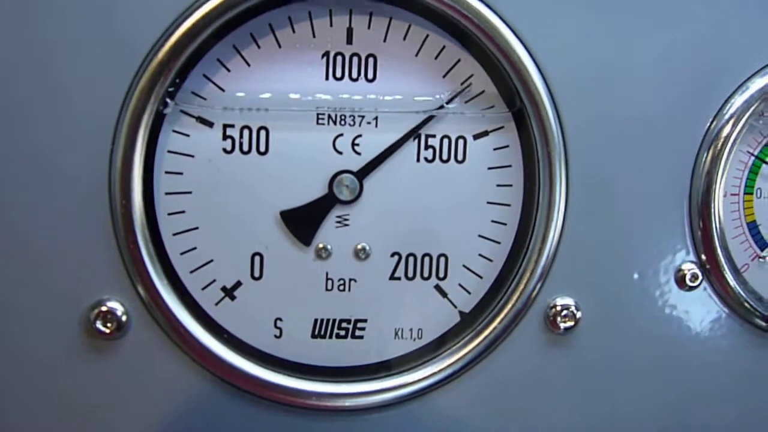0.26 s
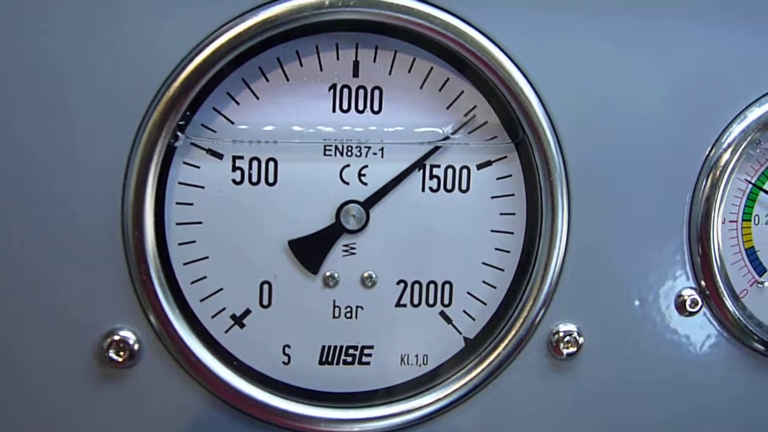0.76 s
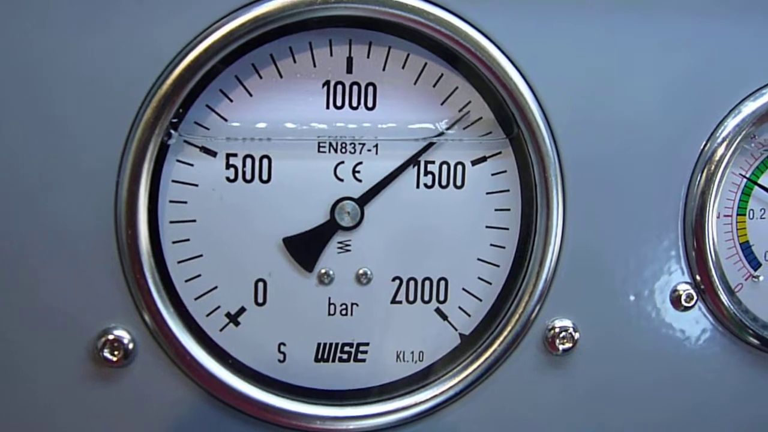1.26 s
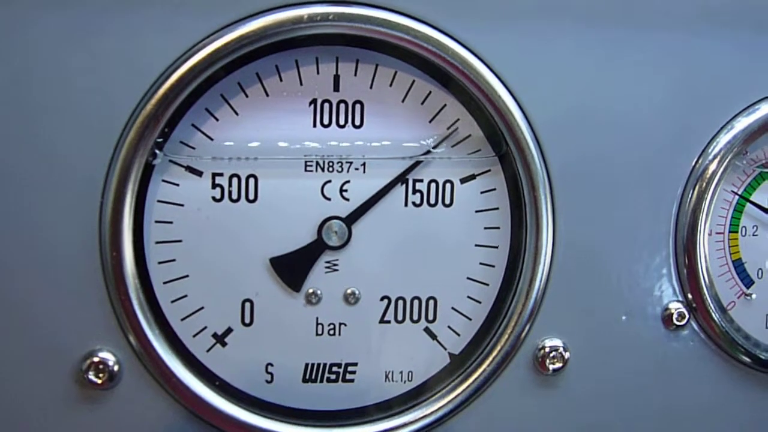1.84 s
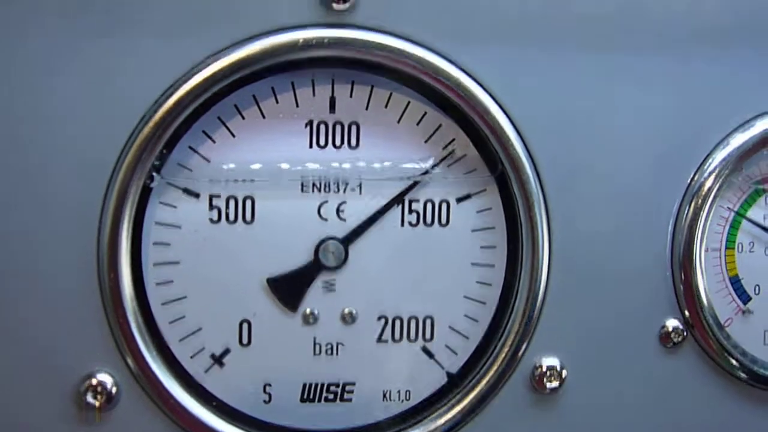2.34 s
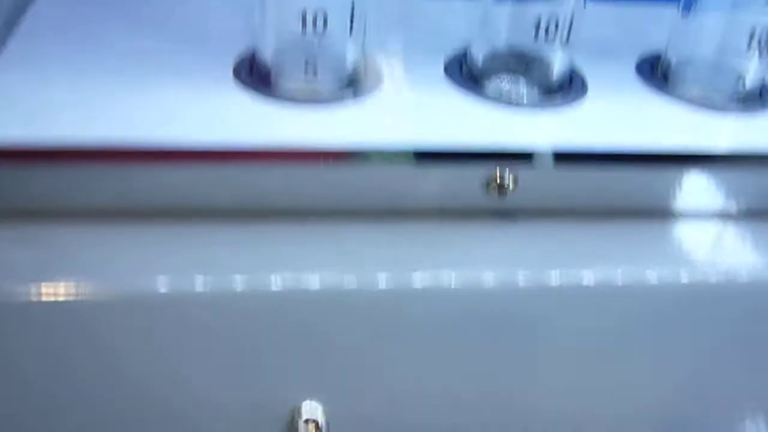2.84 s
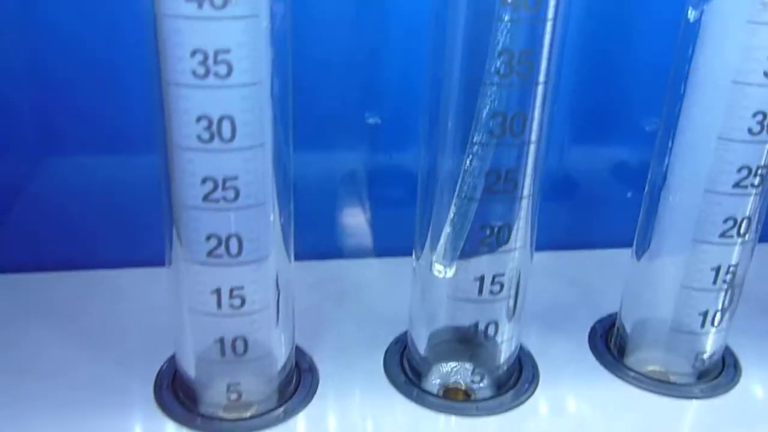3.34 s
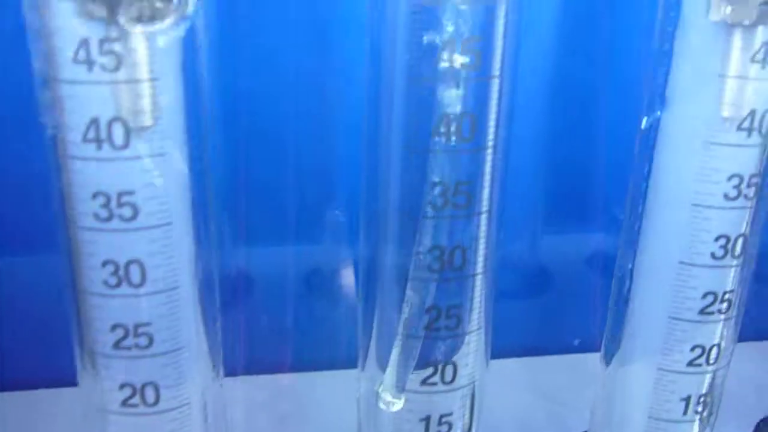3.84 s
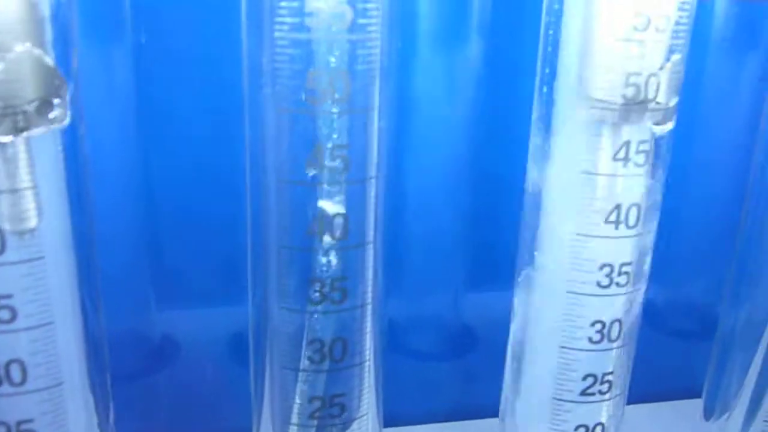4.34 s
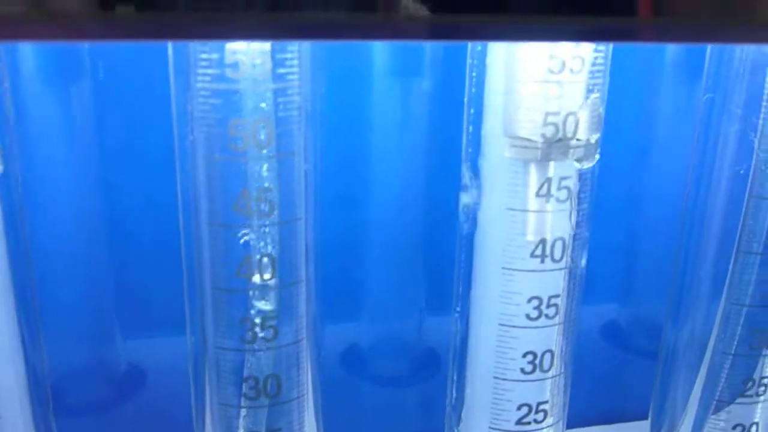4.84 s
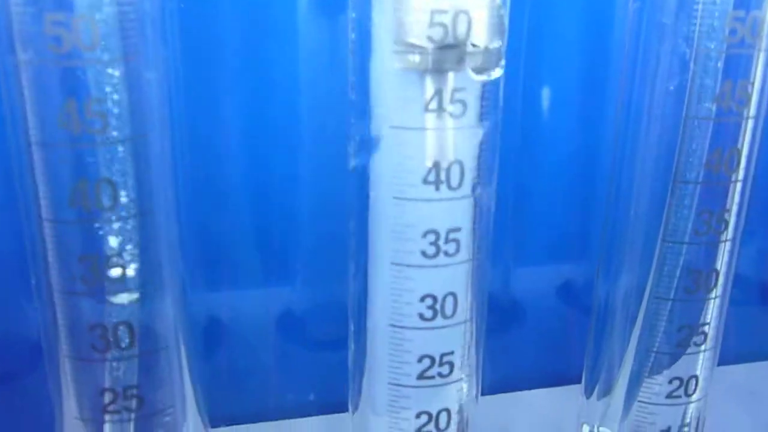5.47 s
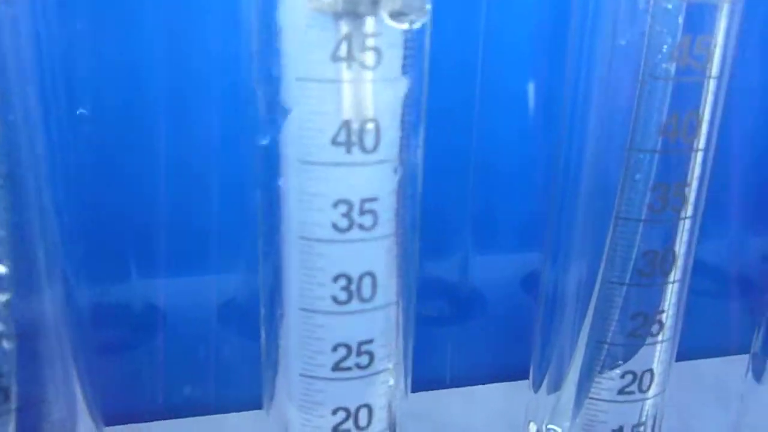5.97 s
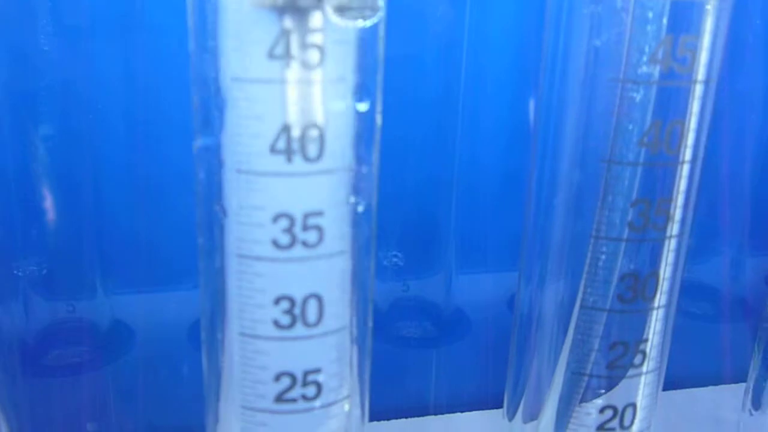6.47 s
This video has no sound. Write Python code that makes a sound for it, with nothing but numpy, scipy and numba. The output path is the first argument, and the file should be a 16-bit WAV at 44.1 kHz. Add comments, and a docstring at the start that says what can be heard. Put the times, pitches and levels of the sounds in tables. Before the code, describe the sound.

Fuel injectors on a workshop test bench snap in turn at a fast, strict beat, merging into a ringing metallic rattle. Beneath it a motor hums steadily and a fan and pump give an even rush. The hand-held microphone picks up a few soft, low handling bumps early on. About halfway through, the tone of the rattle shifts slightly as the microphone moves, while the pace stays the same.

```python
"""Four injectors snap in turn at a strict, fast beat on a workshop test bench.
Each snap and its second jolt ring the cabinet, hood, fuel rail and nozzles; the colour of the ringing
shifts as a small hand-held camera moves from the gauge up to the measuring tubes. Underneath, the motor
hums at twice the mains rate, fan and pump rush on, and the hand on the camera rumbles a little."""
import sys
import numpy as np
from scipy import signal
from scipy.fft import rfft, irfft
from scipy.io import wavfile
from scipy.ndimage import uniform_filter1d
from numba import njit

SR = 44100
rng = np.random.default_rng(int(sys.argv[2]) if len(sys.argv) > 2 else 0)


def persist_wave(psi):
    """Save psi, clipped to +-1, as 16-bit WAV."""
    counts = np.round(np.clip(psi, -1, 1) * 32767).astype(np.int16)
    wavfile.write(sys.argv[1], SR, np.atleast_2d(counts).T)


N = 295470


def undb(db):
    return 10 ** (np.asarray(db) / 20)


def band(x, lo_hz, hi_hz, order=3):
    return signal.sosfilt(signal.butter(order, [lo_hz, hi_hz], "band", fs=SR, output="sos"), x)


def unit_rms(x):
    return x / np.sqrt(np.mean(x ** 2))


def drift(rate_hz):
    """Smooth random wander: levels held for 1 / rate_hz seconds and slewed twice."""
    hold = int(SR / rate_hz)
    steps = np.repeat(rng.standard_normal(N // hold + 1), hold)
    return 1.8 * uniform_filter1d(uniform_filter1d(steps, hold), hold)[:N]


@njit
def ring_modes(length, onsets, strength, pole, rise_samples):
    """Struck modes swell and die away; onsets are fractional samples, strength is blows x modes."""
    out = np.zeros(length)
    for m in range(len(pole)):
        tail, attack, blow = 0j, 0j, 0
        attack_pole = pole[m] - 1 / rise_samples[m]
        tail_step, attack_step = np.exp(pole[m]), np.exp(attack_pole)
        for i in range(length):
            tail, attack = tail * tail_step, attack * attack_step + 1e-18
            if blow < len(onsets) and i >= onsets[blow]:
                tail += strength[blow, m] * np.exp(pole[m] * (i - onsets[blow]))
                attack += strength[blow, m] * np.exp(attack_pole * (i - onsets[blow]))
                blow += 1
            out[i] += tail.imag - attack.imag  # taking away a faster decay softens the onset
    return out


def hand_rumble():
    """The hand sends a dull rumble through the camera body; each bump swells and dies away over it."""
    # steady rumble of the grip, firmer at the gauge: time_s, level_db
    grip = [(0, -54), (1.7, -55.5), (3.0, -58), (6.7, -60)]
    # bumps of the hand: peak_s, level_db
    bumps = [(0.236, -40), (.59, -46), (.81, -45), (.99, -49), (1.225, -34), (1.38, -43), (1.57, -49),
             (1.7, -42), (2.25, -46), (2.54, -38), (2.77, -49), (2.9, -52), (4.09, -49), (4.33, -50),
             (6.03, -47)]
    rise_db_per_s, fall_db_per_s = 349, 295
    t = np.arange(N) / SR
    rumble = unit_rms(band(rng.standard_normal(N), 45, 130, order=2))
    thud = unit_rms(band(rng.standard_normal(N), 100, 330, order=2))
    rumble_db = np.interp(t, *np.transpose(grip))
    for peak_s, level_db in bumps:
        below_peak_db = np.maximum(rise_db_per_s * (peak_s - t), fall_db_per_s * (t - peak_s))
        rumble_db = np.maximum(rumble_db, level_db - below_peak_db)
    thud_db = -49 + 0.87 * (rumble_db + 45)  # a harder grip also lifts the higher band
    return undb(rumble_db) * rumble + undb(thud_db) * thud


def fan_and_pump():
    """Fan, pump and oil make a bed of rushing noise whose level flickers a little."""
    # spectrum of the rush: frequency_hz, density_db (power per Hz)
    spectrum = [(30, -79.5), (55, -90.5), (85, -66.5), (170, -69), (450, -62), (760, -75), (1050, -70.5),
                (1400, -79.5), (2000, -77), (2700, -73), (3800, -88), (4500, -103), (5400, -110)]
    hz, density_db = np.transpose(spectrum)
    bins_hz = np.maximum(np.arange(N // 2 + 1) * SR / N, 1)
    colour_db = np.interp(np.log(bins_hz), np.log(hz), density_db, left=-100, right=-140)
    colour = undb(colour_db) * np.sqrt(SR / 2)
    rush = irfft(rfft(rng.standard_normal(N)) * colour, N)
    return rush * undb(drift(rate_hz=13))


def motor_hum():
    """The motor's magnetic and shaft tones hold their pitch and waver slightly in level."""
    # motor tones: pitch_hz, rms_db
    tones = [(120.0, -32), (162.5, -50), (240.1, -43.5), (6223, -90.5)]
    t = np.arange(N) / SR
    hum = 0
    for pitch_hz, rms_db in tones:
        amplitude = np.sqrt(2) * undb(rms_db + 0.39 * drift(rate_hz=4.1))
        hum = hum + amplitude * np.sin(2 * np.pi * (pitch_hz * t + rng.random()))
    return hum


def injectors():
    """Each firing strikes all four parts; which injector fires and the camera's place set the colour."""
    # ringing modes of each part: pitch_hz, t60_s, rise_s, strike_db for injectors 1-4,
    # change_db at the left tubes, change_db at the right tubes
    cabinet = [(157.5, 0.11, 0.00038, -24.5, -42.5, -51, -33, 1, 2.5),
               (164.4, 0.29, 0.0017, -37, -29.5, -33.5, -35, 2.5, 2.5),
               (210.87, 0.246, 0.0019, -26, -30, -23.5, -34.5, 0, 1),
               (212.65, 0.11, 0.00019, -35.5, -18, -13, -45.5, 0.5, 0.66),
               (220, 0.025, 0.00054, -37, -18, -8, -28, -1.6, -1.5),
               (264.1, 0.66, 0.00053, -39, -45, -32.5, -45.5, -2, -2.5),
               (309.8, 0.6, 0.011, -28, -39.5, -35.5, -34, -6.5, -7.5),
               (338.7, 0.18, 0.0028, -31, -28.5, -38.5, -37, 4, 4.5),
               (336.9, 0.077, 0.009, -24.5, -39, -12.5, -16.5, -0.2, 1.0),
               (359.9, 0.63, 0.00086, -33.5, -30.5, -33.5, -43, 0, 1.5),
               (359.3, 0.13, 0.00033, -32, -35.5, -49, -29.5, 2, 2.5),
               (427, 0.09, 0.0002, -38.5, -46, -41, -58.5, 5.5, 7.5),
               (471.7, 0.087, 0.00062, -18.5, -38, -24.5, -22, -13.5, -11.5),
               (475.3, 0.2, 0.00048, -25, -25, -28.5, -41.5, -2.5, -0.8),
               (509, 0.2, 0.00017, -19.5, -35, -42.5, -38.5, -4, 0.5),
               (512.8, 0.077, 0.0017, -12.5, -20.5, -44.5, -43.5, -1, -2),
               (565.5, 0.38, 0.00011, -25, -30.5, -50.5, -60, -0.5, 3.5),
               (605.6, 0.28, 0.00038, -31, -30, -36, -32.5, 6.5, 5.5),
               (606.4, 0.064, 0.0057, -25, -16.5, -32, -15, 5.5, 4.5),
               (619.2, 0.054, 0.0053, -20, -18, -17, -41.5, 6, 6.5),
               (645.3, 0.03, 0.0011, -20.5, -12, -13.5, -36.5, 4.5, 3),
               (665, 0.067, 0.0006, -16, -34.5, -26, -38, 3.5, 1.2),
               (684.6, 0.059, 0.0063, -34.5, -37.5, -22, -10.5, 2, -1),
               (688.3, 0.17, 0.0012, -42, -24.5, -32, -31, 0.5, -4.5),
               (722.5, 1, 0.00033, -47.5, -38.5, -45, -59, 4.5, 3),
               (640.4, 0.25, 0.002, -38.5, -40, -44.5, -44.5, 4.5, 7)]
    hood = [(803.7, 0.33, 0.0004, -58, -64, -51, -57.5, 5, 8.5),
            (857.5, 0.042, 0.0009, -27.5, -35.5, -47.5, -27.5, 5.5, 9.5),
            (855, 0.048, 0.0019, -24.5, -51, -32.5, -25.5, 4, 8.5),
            (862.4, 0.055, 0.0003, -27, -45.5, -23.5, -27, -1.5, -2.5),
            (890, 0.025, 0.00057, -46.5, -25, -23.5, -27.5, -4.5, -3),
            (962.4, 0.14, 0.0013, -28, -35, -49.5, -35.5, 5.5, 11.5),
            (965, 0.083, 0.00016, -16.5, -33.5, -33.5, -28, 1, 2),
            (1017, 0.26, 0.00046, -31, -45.5, -41, -48.5, 0.5, 3),
            (1041, 0.25, 0.0012, -52, -40, -37, -38, 1.2, 0),
            (1077.6, 0.038, 0.00032, -27.5, -29.5, -29, -46, 7, 11.5),
            (1089.6, 0.025, 0.0026, -26, -31.5, -24.5, -42, 7.5, 16),
            (1119, 0.074, 0.013, -32, -49, -36.5, -41.5, 5.5, 12),
            (1192.8, 0.057, 0.0043, -47, -40.5, -29, -34, 7.5, 5.5),
            (1193.0, 0.055, 0.0041, -42, -49.5, -33, -41, 10, 11.5),
            (1279, 0.13, 0.0002, -50.5, -59, -44, -46, 1.5, 7),
            (1352.2, 0.36, 0.0002, -47, -35.5, -37.5, -38, -0.5, -0.5),
            (1382, 0.51, 0.00042, -47.5, -29, -50, -57, -7, -10.5),
            (1422.5, 0.28, 0.015, -50.5, -48.5, -40.5, -58, 3, 5),
            (1530, 0.013, 0.0003, -40, -29, -40.5, -41, -4.5, -8),
            (1586, 0.15, 0.001, -56.5, -55, -50.5, -47.5, -4, -4.5),
            (1058, 0.1, 0.003, -40, -46.5, -50.5, -52, 2, 5)]
    rail = [(1713, 0.035, 0.0015, -40.5, -40.5, -49.5, -44.5, -7.5, 7.5),
            (1804, 0.055, 0.0016, -50.5, -35, -50, -35, -12, 1),
            (1827, 0.33, 0.0002, -55.5, -61, -49, -62.5, 10, 4.5),
            (1873.4, 0.46, 0.00065, -45, -38.5, -44, -58, 4.5, 1.5),
            (1910, 0.056, 0.0017, -33.5, -23, -51.5, -25.5, 2.5, -2.5),
            (1924.5, 0.052, 0.0067, -20, -22.5, -30, -20, 0, -3),
            (1994, 0.057, 0.00023, -29.5, -34.5, -36, -46, -18, 5.5),
            (2028, 0.031, 0.00057, -24.5, -27.5, -27, -28.5, -1.8, 1),
            (2058, 0.16, 0.00019, -37.5, -47, -51, -33.5, -2, 0),
            (2130, 0.24, 0.00066, -45.5, -64, -51, -40, -5, 8.5),
            (2247, 0.057, 0.0026, -35, -31, -34, -44, -5.5, -5.5),
            (2313.6, 0.17, 0.0011, -38, -49.5, -37, -36, 1.4, 2),
            (2327, 0.042, 0.0041, -27, -37, -28.5, -28.5, 2, 3),
            (2457, 0.12, 0.0023, -36, -46.5, -49.5, -45, -12, -3.5),
            (2501, 0.068, 0.003, -46.5, -44, -34.5, -62, 7, 4),
            (2503, 0.021, 0.0041, -31, -44.5, -27.5, -41.5, 13, 10),
            (2538, 0.032, 0.0041, -35.5, -36.5, -30, -43, 8, 10),
            (2604, 0.083, 0.0018, -35.5, -36.5, -46, -47, -3.0, 3),
            (2664.7, 0.085, 0.0079, -44.5, -39, -49.5, -23.5, 6.5, -3.5),
            (2669.1, 0.063, 0.0077, -22.5, -32, -38.5, -21.5, 1, -0.5),
            (2760, 0.29, 0.0021, -62.5, -45.5, -49, -42, 2.5, -5),
            (2844, 0.22, 0.00057, -35.5, -50.5, -43.5, -39.5, -1.7, -5.5),
            (2885.4, 0.12, 0.00022, -38, -42.5, -44, -41, -2.5, -12.5),
            (2873, 0.018, 0.00045, -46, -25.5, -36.5, -61.5, -1, -0.5),
            (3023, 0.039, 0.0042, -44.5, -33.5, -35, -57.5, 5.5, 7.5),
            (3031, 0.072, 0.002, -45, -37.5, -45, -40.5, 2, 3.5),
            (3257, 0.016, 0.0025, -50.5, -53, -34, -44.5, 5, 4.5),
            (3274, 0.25, 0.00054, -65.5, -45.5, -62, -48.5, -6.5, -1.5),
            (3390, 0.015, 0.00031, -40.5, -63, -45.5, -34.5, -6, -8.5),
            (3464, 0.08, 0.0002, -55, -53, -59.5, -56.5, 2, 3.5),
            (2685, 0.04, 0.002, -45, -44.5, -58, -56.5, 5, 12.5)]
    nozzles = [(3520, 0.04, 0.022, -51, -49, -44, -46.5, 5, -3),
               (3630, 0.02, 0.00018, -50.5, -87, -60.5, -60, 9, 5.5),
               (3686, 0.049, 0.018, -60.5, -63, -45.5, -57, 12, 9),
               (3858, 0.067, 0.0002, -64, -48.0, -52, -65, -4.5, -1.5),
               (3960, 0.053, 0.015, -72, -69.5, -50, -52.5, -5, 14),
               (4010, 0.044, 0.0049, -55, -54.5, -61, -60, 3.5, 6),
               (4220, 0.042, 0.003, -54, -79, -86, -63.5, -1.5, 6),
               (4350, 0.055, 0.0074, -62.5, -63, -69, -70.5, 6, 8),
               (4490, 0.05, 0.0048, -65, -85.5, -60.5, -77.5, 1, 7),
               (4500, 0.07, 0.0028, -63, -63.5, -71, -70.5, 5.5, -1.5),
               (4660, 0.075, 0.0127, -64, -73.5, -69, -60.5, -8.5, 2),
               (4850, 0.015, 0.00065, -60.5, -45.5, -76, -76, -5, -3),
               (4940, 0.066, 0.01, -68, -63.5, -70, -69.5, 3.5, 7),
               (5010, 0.015, 0.00046, -52.5, -65, -61, -58, -1.5, -1),
               (5160, 0.06, 0.001, -74.5, -61, -67.5, -66.5, -3, -0.5),
               (5200, 0.017, 0.00037, -59, -56.5, -63, -58, -0.5, 2.5),
               (5216.2, 0.02, 0.0022, -47, -74, -70.5, -57, -3.5, -1),
               (5334, 0.069, 0.013, -52.5, -57, -63, -65, -2.5, -1.5)]
    # radiating band and second jolt, a row per part: low_hz, high_hz, lag_s, jolt_db for injectors 1-4
    responses = [(113.6, 858, 0.004879, -10.5, -4.7, -10.8, -4.0),
                 (709.1, 1815, 0.00255, -3.9, -0.8, -3.7, -7.1),
                 (1500.0, 3850, 0.0096, -30.0, -16.8, -9.4, -14.3),
                 (3181.8, 6160, 0.007984, -30.0, -12.7, -8.2, -2.0)]
    # balance shift at the left and right tubes, a row per part: change_db for injectors 1-4
    left_balance = [(-0.3, -.3, -0.2, -1.1), (-2, 0.57, 0.3, -0.8), (-0.6, -0.041, 0.5, -1.2),
                    (-0.5, -1.2, 2, 0.5)]
    right_balance = [(.1, 0.72, 0.9, 0.37), (.1, 0.082, -1, -0.31), (1, .3, 0.8, -0.98), (.3, -1.6, 1, .1)]
    # one value per part: gain_db, and blow-to-blow scatter_db of its modes
    part_gain_db = (0.54, .9, 1.1, 2.2)
    scatter_db = (.3, .9, .8, 1.2)
    # camera path: time_s, place (0 gauge, 1 left tubes, 2 right tubes)
    path = [(0, 0.012), (2.3, 0), (2.7, 0.14), (3.2, 0.71), (4.0, 1.07), (4.8, 1.38), (5.6, 1.61),
            (6.7, 1.67)]
    # firing moments within the cycle: start_s for injectors 1-4
    starts_s = (.0050, .0330, .0621, .0942)
    cycle_s, lead_cycles = 5289.2 / SR, 4  # the lead-in has the bench already ringing at the start
    jitter_s, force_spread_db = 7e-6, .4

    lead = int(lead_cycles * cycle_s * SR)
    cycles = np.arange(-lead_cycles, N / SR / cycle_s)
    beat_s = (cycles[:, None] * cycle_s + starts_s).ravel()
    lateness, force = rng.standard_normal((len(beat_s), 2)).T
    fire_s = beat_s + jitter_s * lateness
    injector = np.arange(len(fire_s)) % 4
    place = np.interp(fire_s, *np.transpose(path))[:, None]
    at_left, at_right = 1 - abs(place - 1), np.clip(place - 1, 0, 1)
    bench = 0
    for part, modes in enumerate((cabinet, hood, rail, nozzles)):
        pitch_hz, t60_s, rise_s, *strike_db, left_db, right_db = np.transpose(modes)
        low_hz, high_hz, lag_s, *jolt_db = responses[part]
        snap_db = part_gain_db[part] + np.array(strike_db)[injector] + force_spread_db * force[:, None]
        snap_db += at_left * (left_db + np.array(left_balance[part])[injector, None])
        snap_db += at_right * (right_db + np.array(right_balance[part])[injector, None])
        # a second jolt follows each snap
        second_db = snap_db + np.array(jolt_db)[injector, None]
        onsets = np.stack([fire_s, fire_s + lag_s], axis=1).ravel() * SR + lead
        blow_db = np.stack([snap_db, second_db], axis=1).reshape(len(onsets), -1)
        blow_db += scatter_db[part] * rng.standard_normal(blow_db.shape)
        polarity = (-1.) ** np.arange(len(modes))  # neighbouring modes move against each other
        pole = (2j * np.pi * pitch_hz - np.log(1000) / t60_s) / SR
        ringing = ring_modes(N + lead, onsets, polarity * undb(blow_db), pole, rise_s * SR)
        bench = bench + band(ringing, low_hz, high_hz)[lead:]
    return bench


def scene():
    """The snapping injectors over hum, rush and rumble, in mono."""
    return (injectors() + motor_hum() + fan_and_pump() + hand_rumble())[None]


def record(dry):
    """The converter adds hiss and a small offset; its filters round off the treble, then cut it."""
    rolloff_hz, cutoff_hz, dc_offset = 7770, 8830, -0.0068
    hiss = undb(-63) * unit_rms(rng.standard_normal(N))
    softened = signal.sosfilt(signal.butter(18, rolloff_hz, fs=SR, output="sos"), dry + hiss)
    return signal.sosfilt(signal.ellip(10, .2, 90, cutoff_hz, fs=SR, output="sos"), softened + dc_offset)


dry = scene()
out = record(dry)
persist_wave(out)
```